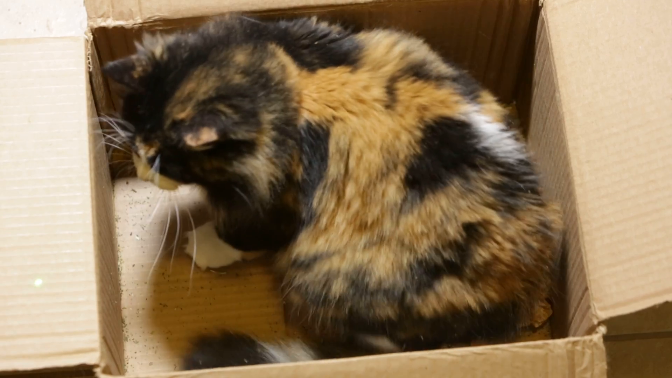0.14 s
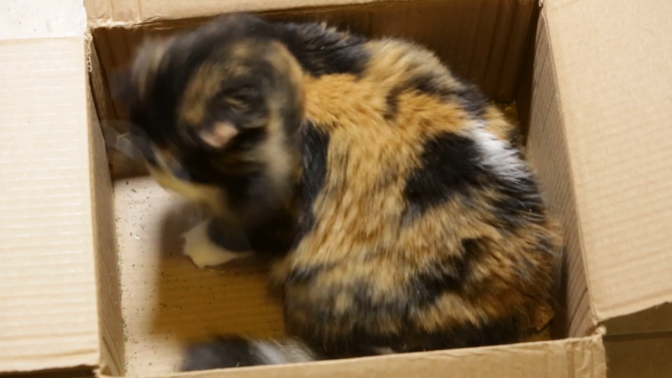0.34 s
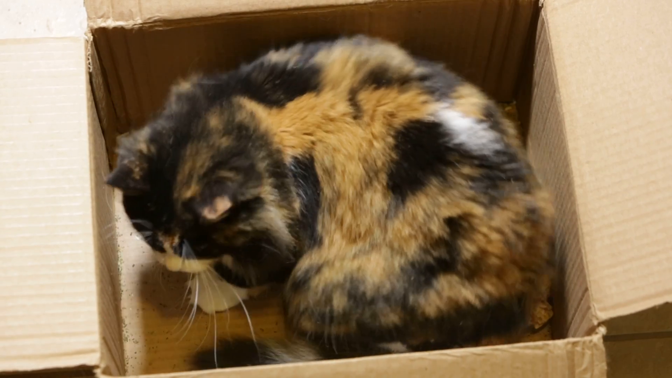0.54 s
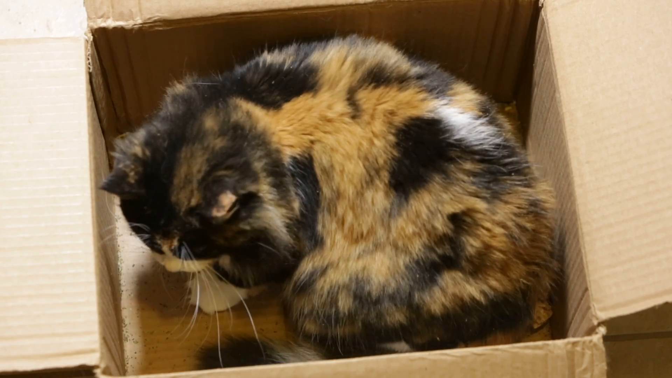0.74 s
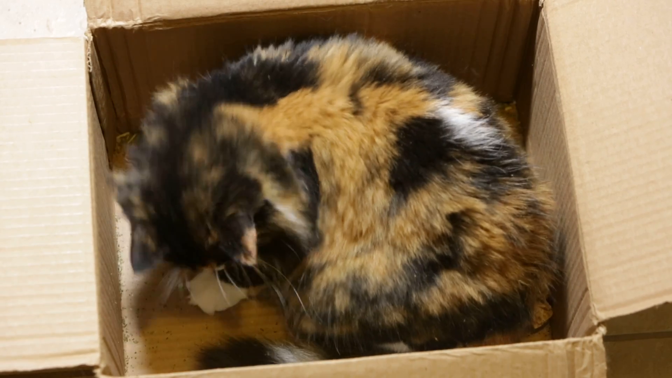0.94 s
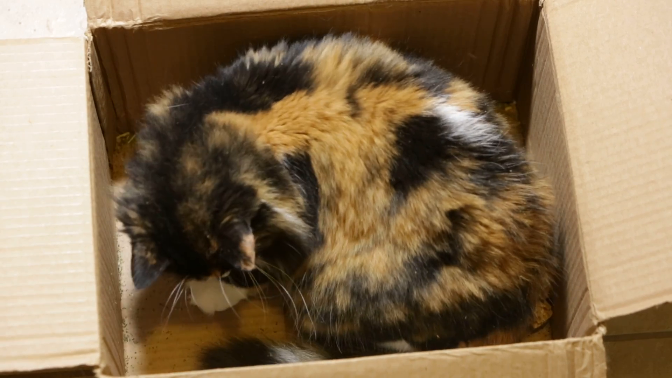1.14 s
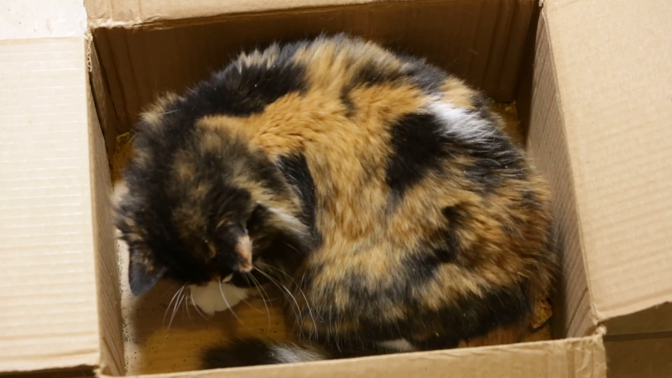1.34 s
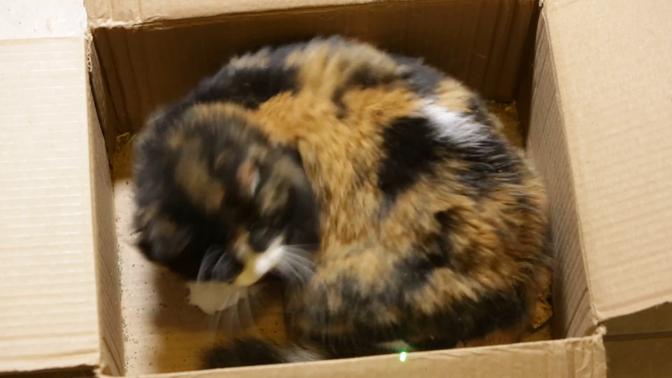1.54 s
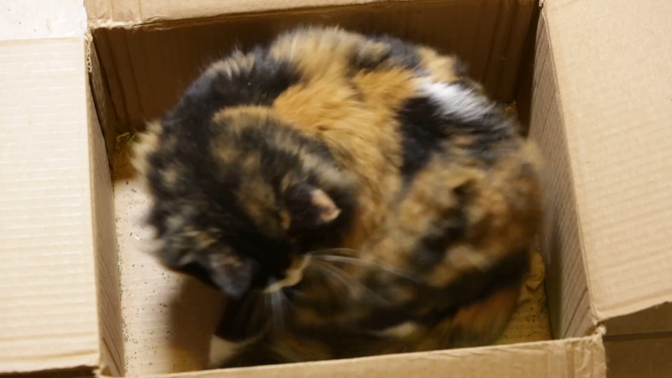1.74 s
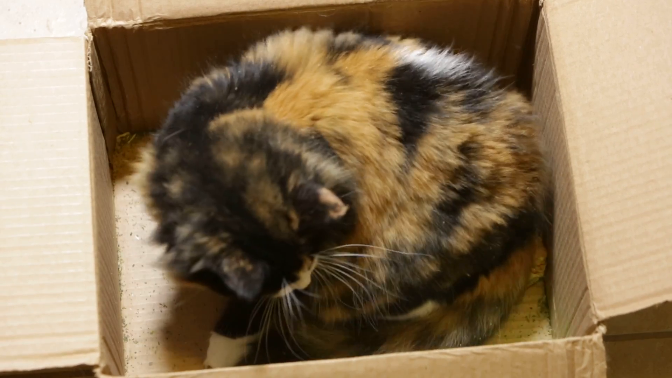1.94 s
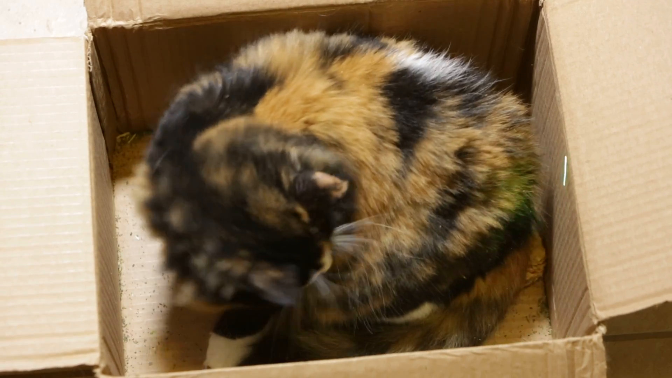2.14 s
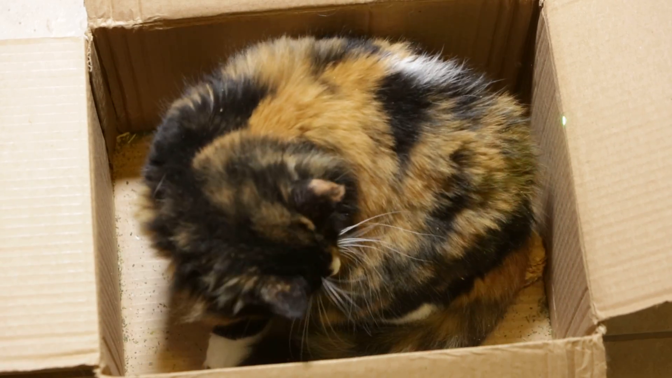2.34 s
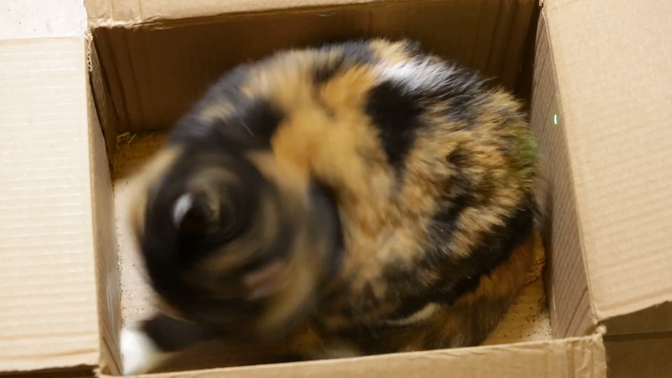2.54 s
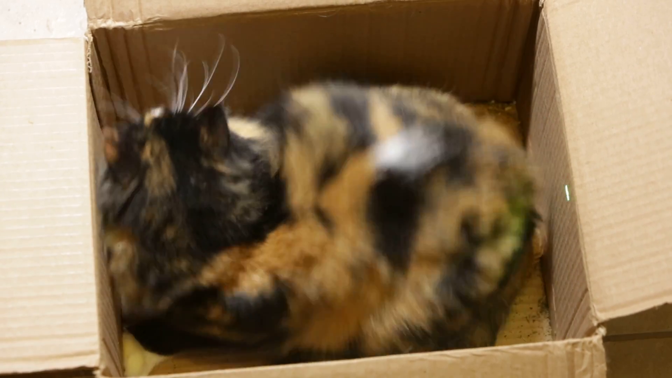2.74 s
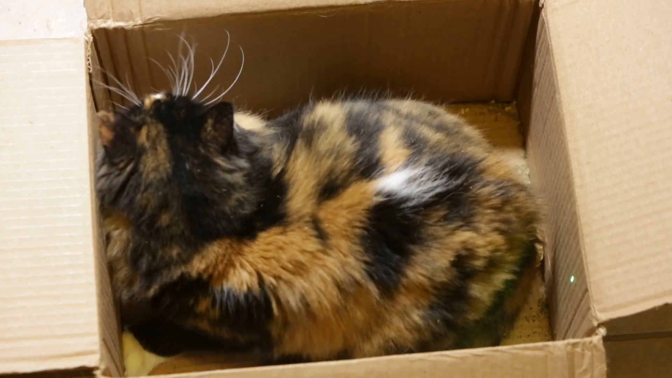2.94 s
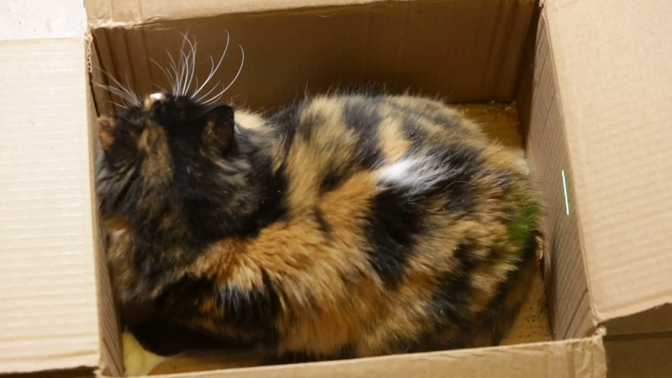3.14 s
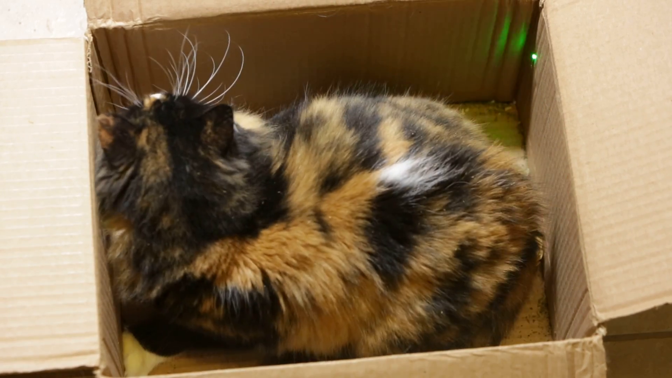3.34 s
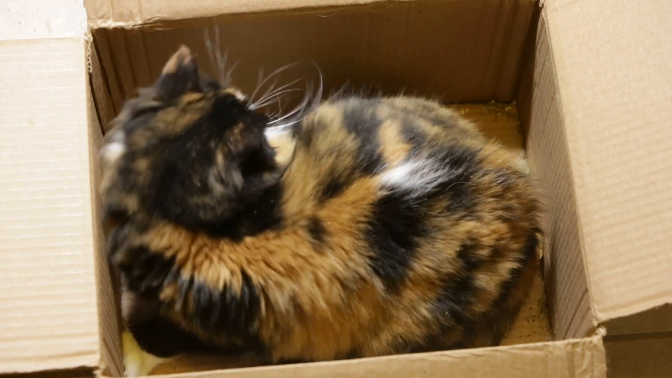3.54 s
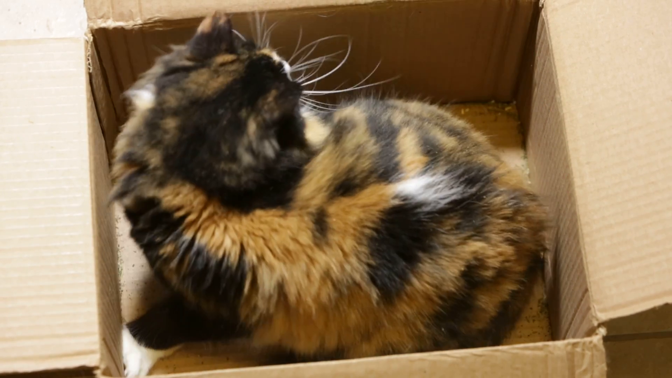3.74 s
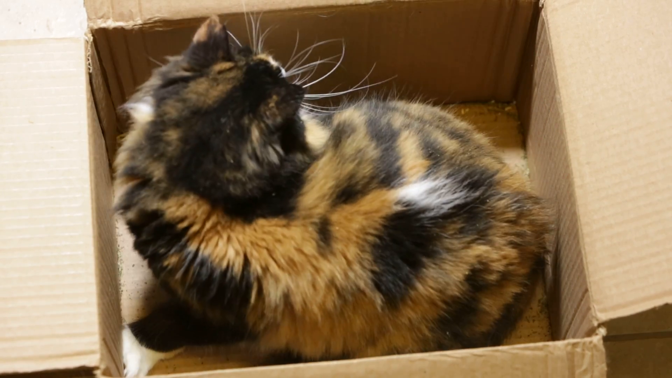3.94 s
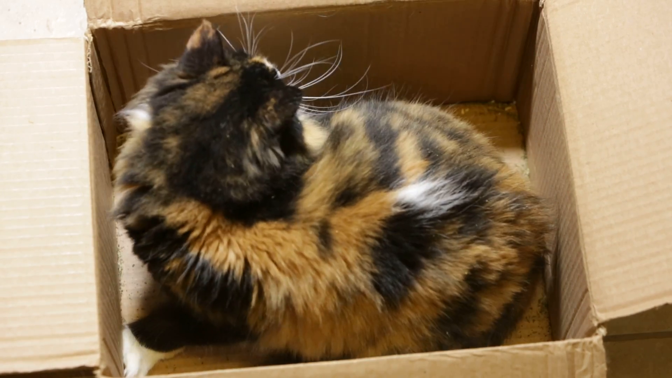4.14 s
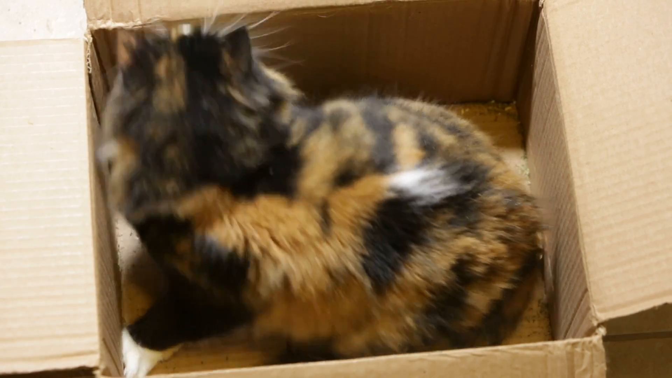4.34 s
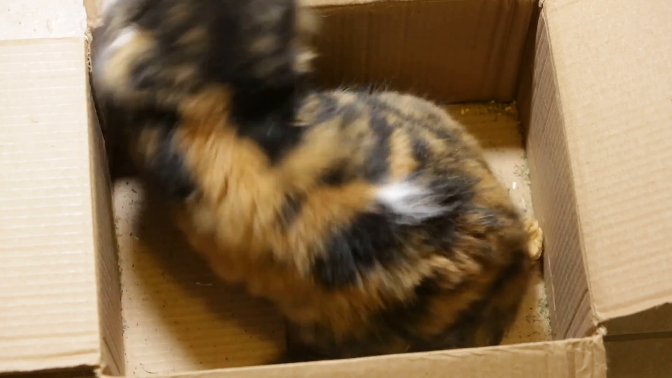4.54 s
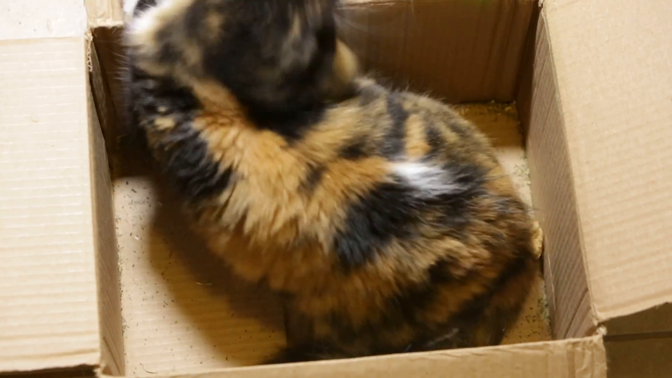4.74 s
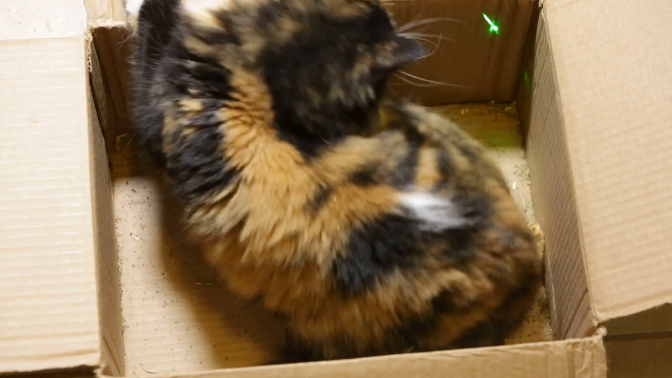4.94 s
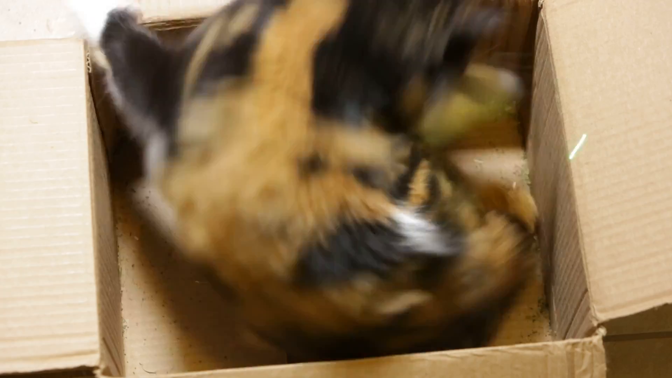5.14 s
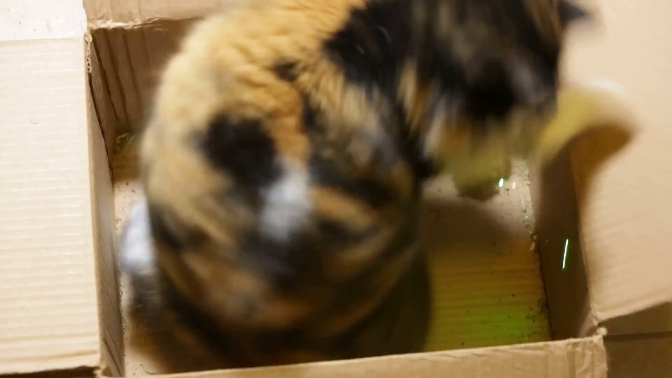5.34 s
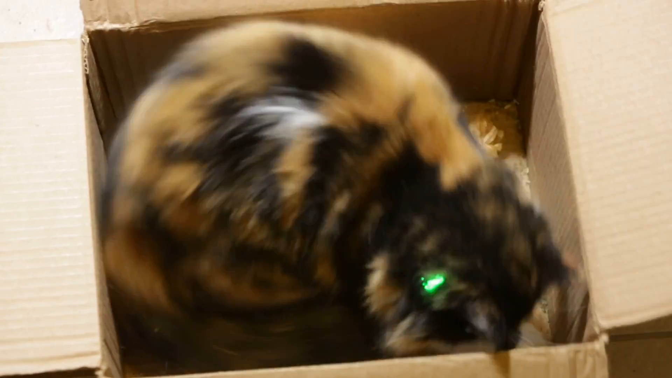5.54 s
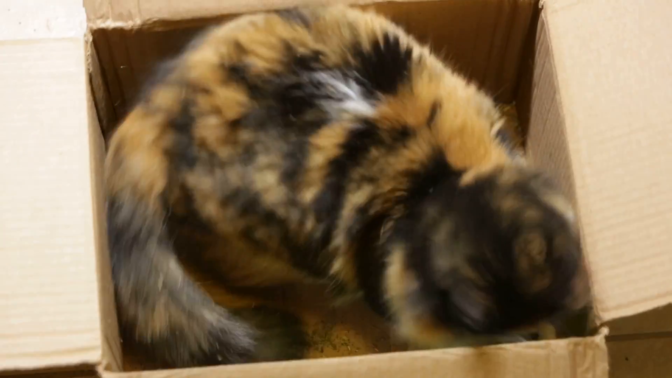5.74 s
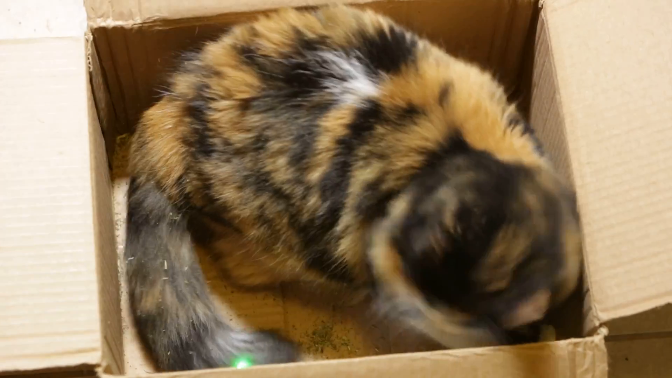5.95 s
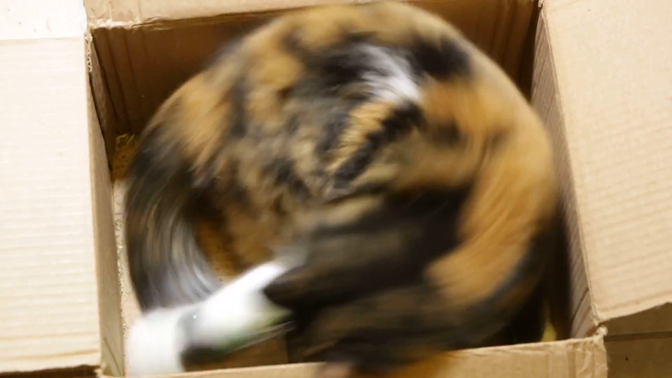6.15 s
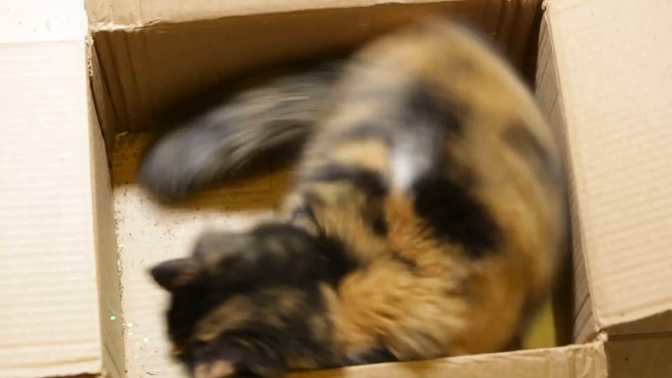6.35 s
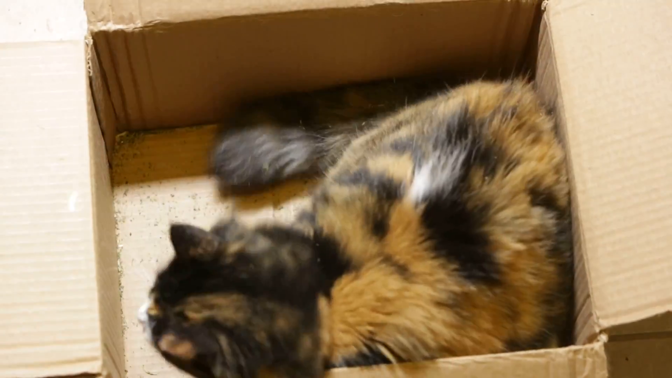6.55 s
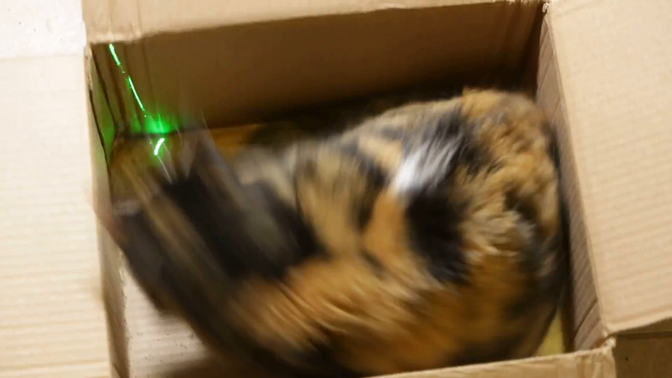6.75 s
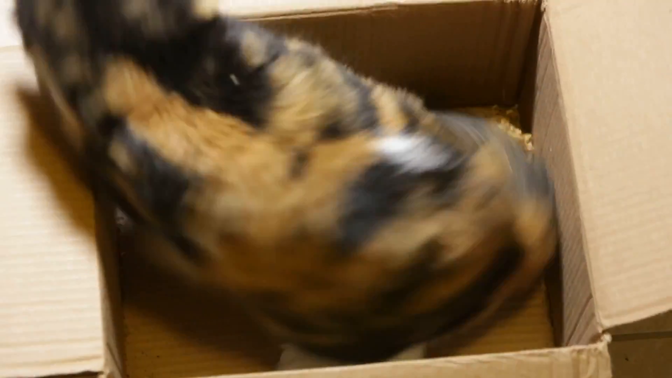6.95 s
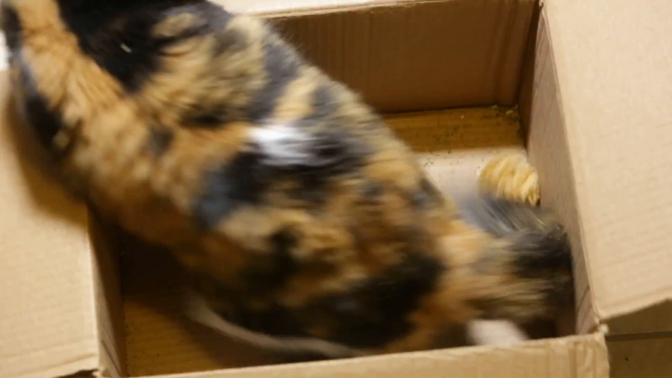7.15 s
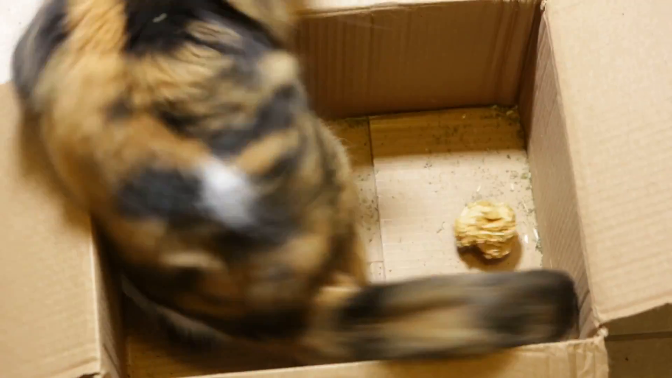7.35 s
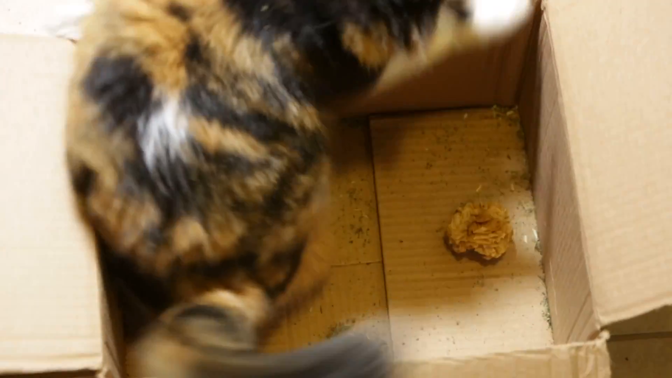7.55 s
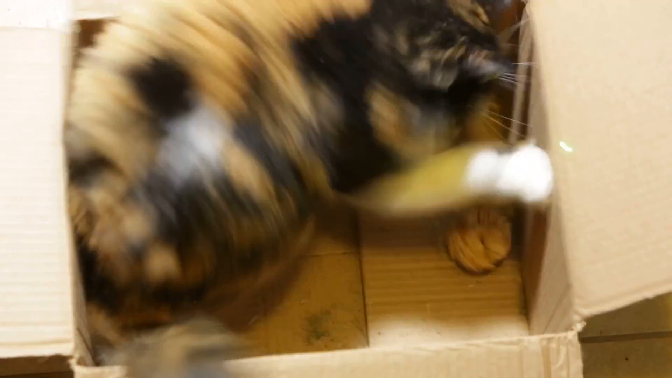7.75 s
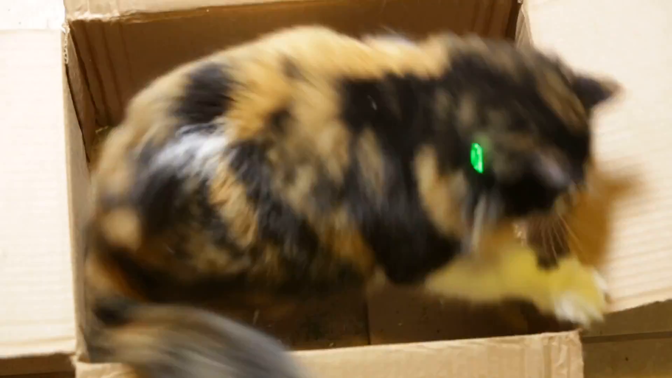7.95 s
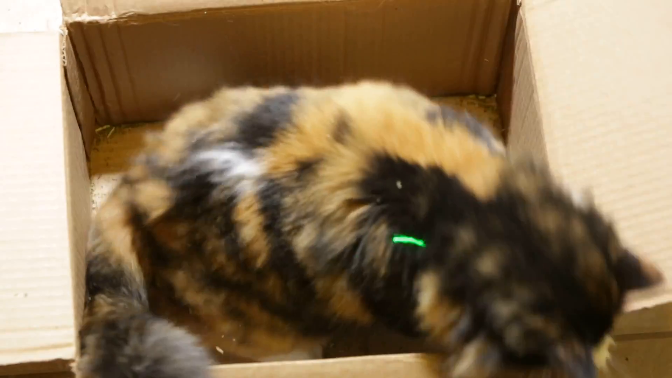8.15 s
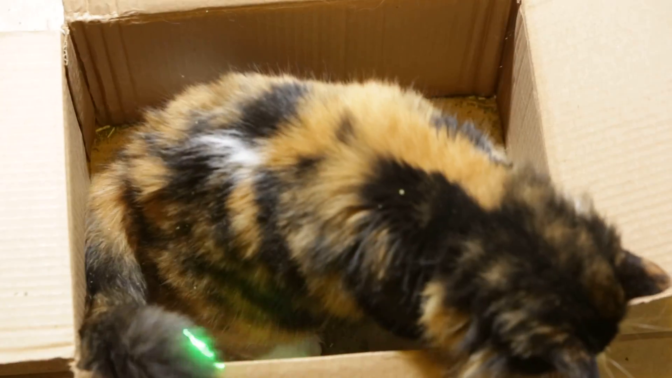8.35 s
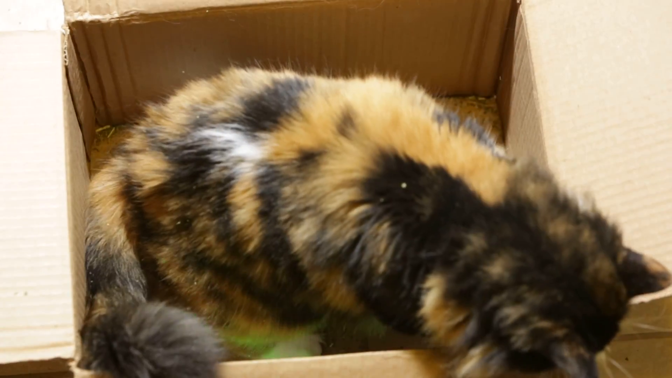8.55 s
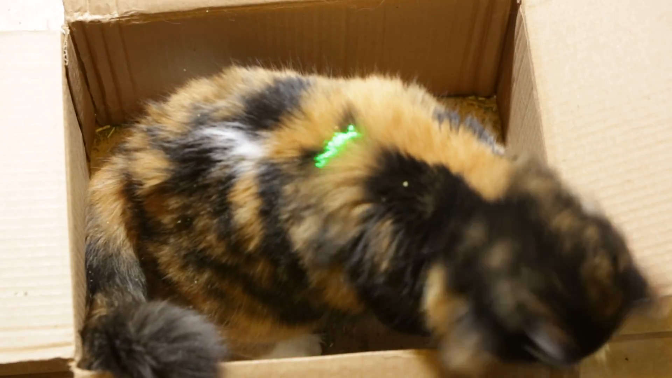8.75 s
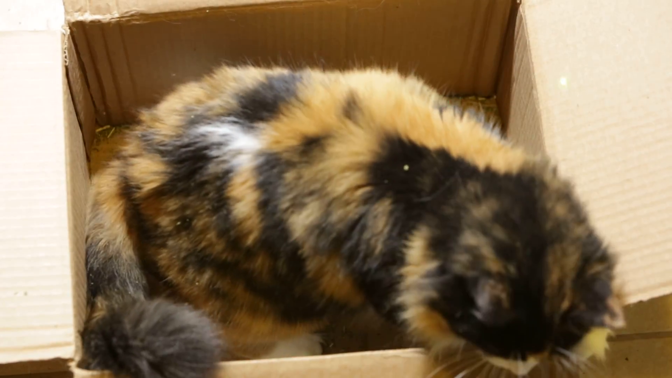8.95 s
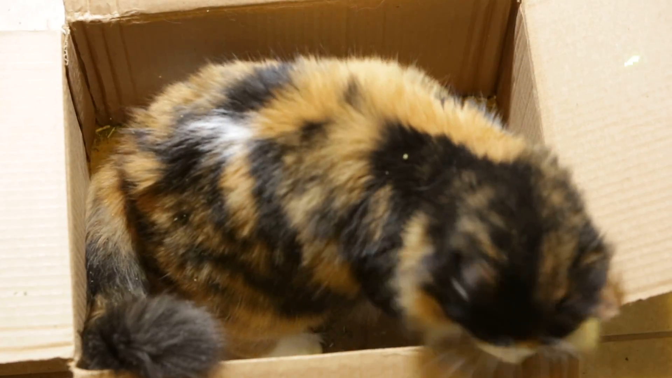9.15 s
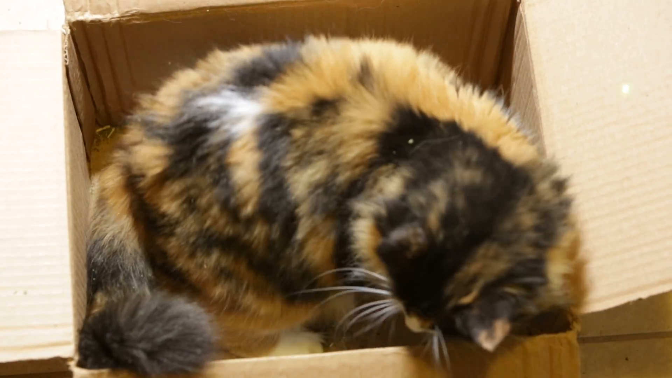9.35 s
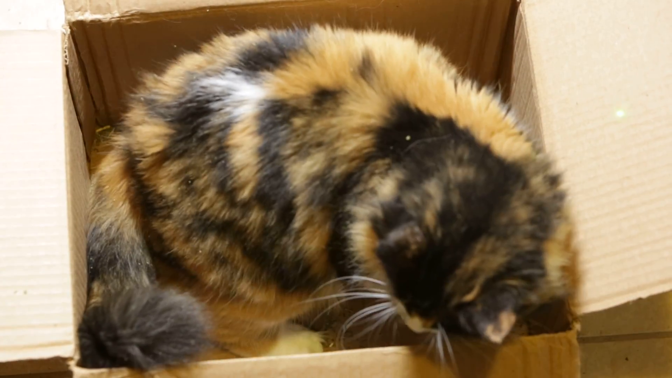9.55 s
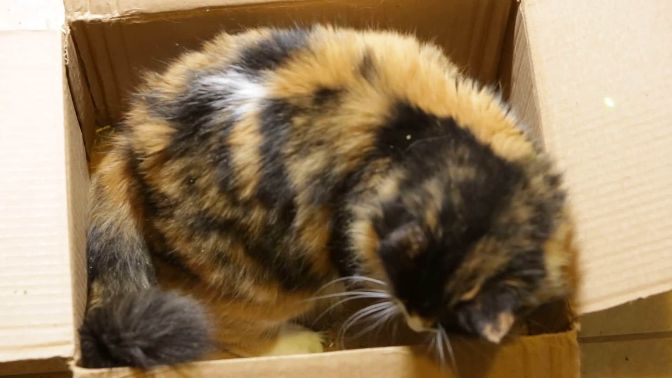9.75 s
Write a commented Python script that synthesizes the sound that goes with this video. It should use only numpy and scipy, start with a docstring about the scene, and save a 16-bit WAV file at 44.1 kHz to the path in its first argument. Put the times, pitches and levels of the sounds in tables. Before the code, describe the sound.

Close bursts of claw scrapes, sharp ticks and hollow paw slaps on cardboard, sparse at first, then busy, as a cat pounces inside a box.

```python
"""A soft rustle, then a sharp claw tick and a pat on cardboard: a cat chases a spot of light in a box.
The box stands open in a small, bare room, with one microphone just above it.
Paws slap and buckle the walls, claws tick and drag over the paper liner, pads knock and creak,
and the body thumps on the bottom. Blows and drags ring the hollow box and set the room booming.
The room echoes over a quiet, steady hush; once there is a faint whistle, like a breath through the nose."""
import sys
import numpy as np
from scipy import signal
from scipy.fft import rfft, irfft, next_fast_len
from scipy.io import wavfile

SR = 44100
rng = np.random.default_rng(int(sys.argv[2]) if len(sys.argv) > 2 else 0)


def int16_out(signal):
    """Quantize to a 16-bit WAV file."""
    q = np.round(np.clip(np.atleast_2d(signal).T, -1, 1) * 32767)
    wavfile.write(sys.argv[1], SR, q.astype(np.int16))


N = 431738
TOP_HZ = 16000
BLOW_WINDOW_S = .025  # a blow's level is its energy spread over this time
BODY_HZ, BODY_MS, BODY_LAG_S = 99, 9.5, 0.00812  # the thump of the cat's weight behind a pad


# Paws on the box, close below the microphone; high if claws land first, low if the pad does:
# (time [s], level [dB], centre [Hz], patter time [ms], body thump [dB])
PAW_SLAPS = [(.1, -34.5, 1467, 1.82, -72), (0.5117, -43.5, 1480, 2.84, -43.5), (1.923, -40, 997, 4.75, -47),
             (2.613, -30.5, 720, 11.7, -39.5), (4.411, -36, 560, 9, -36.5), (4.602, -37, 904, 12, -47),
             (5.2685, -19.5, 1015, 4.79, -52.5), (5.504, -19.5, 1008, 19.3, -37.5),
             (5.568, -26, 972, 4.6, -27), (5.854, -39, 1386, 2.75, -45.5), (6.257, -29.5, 648, 12, -35.5),
             (7.311, -25, 1172, 6, -45), (7.335, -26.5, 1300, 3.02, -35), (7.527, -28.5, 662, 3.42, -26.5),
             (7.8006, -22, 2100, 4.06, -35.5), (7.957, -31, 1176, 8.1, -38)]
def slaps(roll=1.2, pad_hz=398.3, pad_ms=11.36, even_hz=667, pad_db_per_octave=-9):
    """The toes hit, the paw rolls onto its pad, and the body's weight thumps in behind."""
    out = np.zeros(N)
    for s, db, hz, patter_ms, body_db in PAW_SLAPS:
        pad_s = s + roll * patter_ms / 1000
        pad_db = db + pad_db_per_octave * np.log2(hz / even_hz)  # the higher the slap, the less pad
        add(out, s, blow(db, hz, patter_ms))
        add(out, pad_s, blow(pad_db, pad_hz, pad_ms))
        add(out, pad_s + BODY_LAG_S, blow(body_db, BODY_HZ, BODY_MS))
    return out


# Pads pushing off the bottom of the box: (time [s], level [dB], centre [Hz], patter time [ms])
PAD_STEPS = [(.532, -42.5, 282, 9.8), (1.926, -43, 318, 7.2), (2.655, -38, 330, 14),
             (4.424, -32, 261, 12.4), (5.163, -37.5, 340, 7.4), (5.352, -26, 370, 21.3),
             (5.538, -22, 323, 26), (6.285, -21, 477, 19.1), (6.36, -28, 471, 19.2),
             (6.906, -32.5, 351, 60), (7.34, -26, 455, 11.1), (7.53, -24, 258, 10.6),
             (7.664, -32, 312, 11.3), (7.757, -30, 279.8, 14.8), (7.7953, -23, 299.4, 2.13),
             (7.895, -30, 330, 14), (8.082, -30, 368, 10.9)]
def steps(thump_db=-16.5):
    """A pad alone makes a dull, hollow knock, with a little of the body's weight behind it."""
    out = np.zeros(N)
    for s, db, hz, patter_ms in PAD_STEPS:
        add(out, s, blow(db, hz, patter_ms))
        add(out, s + BODY_LAG_S, blow(db + thump_db, BODY_HZ, BODY_MS))
    return out


def blow(db, hz, patter_ms, first_push=2.22, soft_ms=12, swell=0.136, spot_db=9, spot_hz=600):
    """A first push, then the patter of toes and buckling board; a long, soft shove has hardly any push."""
    t = clock(0.3)
    age = 1000 * t / patter_ms
    force = slips(t, rate=4000, spread_db=2.5) * np.exp(-age) * (1 - np.exp(-age / swell))
    force[0] += first_push * np.exp(-patter_ms / soft_ms)
    force = band(force, hz / 2, hz * 1.82)
    # the struck spot has a hollow note of its own, which the soft board damps when it is high
    note = undb(spot_db) / (1 + (hz / spot_hz) ** 2) * ring(force, hz, q=6)
    return level(resonate(force) + note, db, BLOW_WINDOW_S)


# A side wall buckling under a hard paw, close up: (time [s], level [dB], pitch [Hz], flap knock [dB])
WALL_CRACKS = [(5.268, -22.5, 1653, -20), (5.504, -28.5, 1760, -25.5), (7.8, -19, 2512, -21),
               (7.957, -33.5, 1500, -26)]
def cracks(snap_s=.0005, tear_s=0.00464, tear_db=-4, flap_hz=1066, flap_s=0.00201, flap_lag_s=0.003607):
    """The wall snaps through and its flutes crush; just after, the loose flap knocks with a short note."""
    out, t = np.zeros(N), clock(.04)
    flap = np.sin(2 * np.pi * flap_hz * t) * t * np.exp(-t / flap_s)
    for s, db, hz, flap_db in WALL_CRACKS:
        snap = np.sin(2 * np.pi * hz * t) * np.exp(-t / snap_s)
        tear = band(rng.standard_normal(len(t)) * np.exp(-t / tear_s), hz, 2 * hz)
        add(out, s, level(snap, db, BLOW_WINDOW_S) + level(tear, db + tear_db, BLOW_WINDOW_S))
        add(out, s + flap_lag_s, level(flap, flap_db, BLOW_WINDOW_S))
    return out


# Hiss of the paper liner, close up: (frequency [Hz], relative level [dB])
LINER_SPECTRUM = [(200, -22.5), (1000, -1), (2500, -0.5), (4200, -1), (6300, -0.5), (9000, -3), (12000, -9),
                  (16000, -20.5)]
# Claws dragged along the inside of the box; scene() trims both levels:
# (time [s], length [s], liner hiss [dB], panel rasp [dB], rasp centre [Hz])
CLAW_RAKES = [(0.305, 0.01044, -45.5, -42.5, 1300), (0.525, 0.0248, -38.5, -39, 890),
              (1.646, 0.0456, -39, -40, 1464), (1.765, 0.044, -37, -49.5, 690),
              (1.806, 0.01744, -28.5, -33.5, 1250), (2.485, 0.0633, -48, -54.5, 1300),
              (2.611, 0.0564, -36.5, -32.5, 811), (2.722, 0.0742, -33, -42.5, 1840),
              (4.311, 0.0428, -42.5, -44, 926), (4.407, 0.0374, -31.5, -35.5, 1323),
              (4.601, 0.02, -39, -40, 1255), (5.167, 0.05, -42.5, -29.5, 1095),
              (5.5, 0.0506, -32, -20.5, 1040), (5.786, 0.0329, -31, -33.5, 693),
              (6.131, 0.0447, -57.5, -39, 1490), (6.252, 0.02308, -24, -19.5, 1036),
              (6.34, 0.113, -33.5, -49.5, 900), (6.876, 0.0509, -30, -31.5, 1097),
              (6.973, .07, -35.5, -31.5, 982), (7.09, .08, -42, -34, 950), (7.235, 0.037, -26, -31, 1270),
              (7.525, 0.01872, -22.5, -20.5, 806), (7.659, 0.0526, -32.5, -43, 2000),
              (7.741, 0.0634, -27, -36.5, 2200), (7.966, 0.0425, -23.5, -23, 2280),
              (8.078, 0.028, -25.5, -34, 1200), (8.133, 0.0143, -31, -23, 1965)]
def rakes(rise_s=.006, fall_s=0.0201, grain_db=2.28, spread=2.262, glide_per_s=2.2):
    """Claws slip over the flutes: the liner hisses and the panel rasps, its note gliding as they travel."""
    out = np.zeros(N)
    for s, length, hiss_db, rasp_db, hz in CLAW_RAKES:
        rise = rise_s + .4 * length  # long drags begin more gently
        t = clock(length + rise + 0.068) - .3 * rise
        age = t - t[0]
        grip = np.sin(np.pi / 2 * np.clip(age / rise, 0, 1)) ** 2
        pressure = grip * np.exp(-np.maximum(t - 0.759 * length, 0) / fall_s)
        # every patch of board has its own grain
        patch = [(point_hz, db + grain_db * rng.standard_normal()) for point_hz, db in LINER_SPECTRUM]
        hiss = colour(pressure * slips(t, rate=8000, spread_db=3.5), patch)
        jolts = band(slips(t, rate=3000, spread_db=5), hz / spread, hz * spread)
        glide = glide_per_s * rng.uniform(-1.041, 1)
        note = np.interp(age * (1 + glide * age), age, ring(jolts, hz, q=3))
        rasp = resonate(pressure * (jolts + note))
        add(out, s + t[0], level(hiss, hiss_db, length) + level(rasp, rasp_db, length))
    return out


# Rasp of the board under the sliding cat: (frequency [Hz], relative level [dB])
RASP_SPECTRUM = [(35, -37), (70, -5.5), (330, -2.5), (700, 4), (1200, 4.5), (2200, 1.5), (3500, -12),
                 (16000, -36)]
# Fur and feet sliding as the cat turns below the microphone; scene() trims both levels:
# (time [s], length [s], liner hiss [dB], panel rasp [dB])
BODY_SHUFFLES = [(-0.04, 0.547, -49.5, -53), (1.626, 0.3606, -45, -49), (3.503, 0.344, -61.5, -60.5),
                 (4.592, 0.69, -56, -59.5), (5.094, 0.3497, -32.5, -36), (5.495, 0.254, -43, -38.5),
                 (6.092, 0.3436, -43, -44.5), (6.736, 0.1865, -34.5, -37), (6.956, 0.2543, -38.5, -35.5),
                 (7.253, 0.2474, -36, -40), (7.623, 0.364, -36.5, -37.5), (8.027, 0.125, -38, -35),
                 (8.202, 0.226, -56.5, -56.5), (9.167, 0.082, -57, -62.5)]
def shuffles(attack_s=0.071, release_s=0.0293, judder_db=3.0, judder_rate=110):
    """The sliding body judders on the board: the liner hisses and the panel rasps anew for each move."""
    out, t = np.zeros(N), np.arange(N) / SR
    hiss = level(colour(slips(t, rate=5000, spread_db=5), LINER_SPECTRUM), 0, N / SR)
    for s, length, hiss_db, rasp_db in BODY_SHUFFLES:
        now = slice(*np.searchsorted(t, [s - attack_s, s + length + .5]))
        age = t[now] - s
        pressure = np.clip(age / attack_s + .5, 0, 1) * np.exp(-np.maximum(age - length, 0) / release_s)
        jolts = colour(slips(age, rate=2500, spread_db=7.0), RASP_SPECTRUM)
        rasp = level(resonate(jolts), rasp_db, len(age) / SR)
        out[now] += pressure * (undb(hiss_db) * hiss[now] + rasp)
    return undb(judder_db * wander(t, judder_rate)) * out


# Claw tips catching in the liner, close up; scene() trims the level: (time [s], level [dB])
CLAW_TICKS = [(0.0935, -40), (0.0989, -27.5), (0.2387, -40.5), (.308, -44), (.529, -35), (0.5644, -37),
              (1.811, -31), (1.9221, -28.5), (2.11, -55), (2.309, -52), (2.441, -57), (4.41, -30),
              (4.442, -36.5), (5.163, -31.5), (5.2045, -42.5), (5.326, -36.5), (5.569, -29), (5.7136, -42),
              (5.782, -35.5), (5.8541, -36.5), (6.349, -34.5), (6.7656, -33.5), (6.88, -30.5), (7.004, -29),
              (7.2441, -24.5), (7.527, -33), (7.854, -37.5), (8.0874, -28.5), (8.135, -23), (8.449, -50.5)]
def ticks(centre_hz=5304, scatter_octaves=0.135, spread=1.448, crack_s=.0022, tear_s=0.0053, tear_db=1):
    """A claw snaps off the paper: a very short crack, trailed by tearing fibres."""
    out, t = np.zeros(N), clock(0.051)
    # bending waves carry the treble faster than the bass, so the crack is a quick downward sweep
    sweep = np.minimum(t / crack_s, 1)
    crack = np.sin(np.pi * TOP_HZ * crack_s * (1 - sweep) ** 2)
    for s, db in CLAW_TICKS:
        fibres = slips(t, rate=5000, spread_db=3) * np.exp(-t / tear_s)
        snap = level(crack, 0, 1) + level(fibres, tear_db, 1)
        hz = centre_hz * 2 ** (scatter_octaves * rng.standard_normal())
        add(out, s, level(band(snap, hz / spread, hz * spread, order=1), db, BLOW_WINDOW_S))
    return out


# First a faint, high whistle like a breath through the nose; the other rows are creaks in the box:
# (time [s], length [s], pitch [Hz], level [dB])
WHISTLE_AND_CREAKS = [(1.29, .11, 2900, -68), (2.613, .045, 408, -34), (5.178, .025, 1240, -33),
                      (7.311, .012, 1200, -27), (9.184, .05, 1100, -60)]
def whistle_and_creaks(rise_s=0.0085, fall_s=0.0174, sag_per_s=0.55, jitter=0.0322, rough_rate=350):
    """Short, rough notes that sag in pitch; in a creak, a gripping pad slips in step with the board."""
    out = np.zeros(N)
    for s, length, hz, db in WHISTLE_AND_CREAKS:
        t = clock(length + .08)
        pitch = hz * (1 - sag_per_s * t + jitter * wander(t, rough_rate))
        phase = 2 * np.pi * np.cumsum(pitch) / SR
        envelope = np.minimum(t / rise_s, 1) * np.exp(-np.maximum(t - length, 0) / fall_s)
        roughness = undb(2 * wander(t, rough_rate))
        note = np.sin(phase) + undb(-10.5) * np.sin(1.73 * phase)  # one inharmonic overtone
        add(out, s, level(envelope * roughness * note, db, length))
    return out


def slips(t, rate, spread_db):
    """Stick-slip on paper fibres: tiny jolts at random moments, a few much larger than the rest."""
    draws = (rng.random, rng.standard_normal, rng.standard_normal)
    chance, size, push = (draw(max(SR, len(t)))[:len(t)] for draw in draws)
    return (chance < rate / SR) * np.sign(push) * undb(spread_db * np.clip(size, -2, 2))


# Low booming resonances of the room (first three rows), and the hollow ring of the box:
# (frequency [Hz], width [Hz], level over the broad response [dB])
ROOM_AND_BOX_MODES = [(73.6, 5.7, 13.5), (95.45, 15.7, 11.5), (117, 8.2, -0.5), (189.5, 22.7, 3),
                      (261.5, 52, 2), (354.8, 28.4, 12.5), (524.4, 24.8, -3), (1046, 40, -13.5)]
def resonate(x, detune=.014, place_db=2):
    """The room booms and the box rings; each contact favours other modes and shifts them slightly."""
    out = x
    for hz, width, db in ROOM_AND_BOX_MODES:
        shift, place = rng.standard_normal(2)
        out = out + undb(db + place_db * place) * ring(x, hz * (1 + detune * shift), hz / width)
    return out


def room(x, paths=11, shift_rate=25):
    """The cat keeps moving, so its sound enters the room by ever-changing paths."""
    shares = np.array([wander(np.arange(N) / SR, shift_rate) for _ in range(paths)])
    shares = shares / np.sqrt(np.sum(shares ** 2, axis=0))
    return x + sum(signal.oaconvolve(x * share, reflections())[:N] for share in shares)


# The bare room beyond the box, as it reaches the microphone:
# (lower band edge [Hz], time to fall 60 dB [s], level against the direct sound [dB])
ROOM_DECAY = [(38.5, 0.501, -2), (270, 0.4828, -1.5), (8290, 0.374, -0.5)]
def reflections(build_s=0.00149, box_s=0.0041, box_db=-7):
    """One set of paths: quick reflections between the box walls, then the diffuse decay of the room."""
    t = clock(0.89)
    upper_edges = [row[0] for row in ROOM_DECAY[1:]] + [TOP_HZ]
    box = rng.standard_normal(len(t)) * (t > .001) * np.exp(-t / box_s)
    response = level(box, box_db, 1 / SR)
    noise = rfft(rng.standard_normal(len(t)))
    f = np.arange(len(noise)) * SR / len(t)
    for (lo, t60, db), hi in zip(ROOM_DECAY, upper_edges):
        decay = level(undb(-60 * t / t60) * (1 - np.exp(-t / build_s)), db, 1 / SR)
        response = response + decay * irfft(noise * (f >= lo) * (f < hi), len(t))
    return response


# Room tone at the microphone, behind everything: (frequency [Hz], relative level [dB])
HUSH_SPECTRUM = [(12, -56.5), (20, -12.5), (107, -0.5), (198, -5.5), (350, -2.5), (780, -7), (1860, -12),
                 (10000, -19), (16000, -24.5)]
def hush(db=-55):
    """Steady room air and microphone hiss."""
    return level(colour(rng.standard_normal(N), HUSH_SPECTRUM), db, N / SR)


def undb(db):
    """Decibels to gain."""
    return 10 ** (np.asarray(db) / 20)


def level(x, db, seconds):
    """Scale x to the energy of a sound that holds this level for so many seconds."""
    return x * undb(db) * np.sqrt(seconds * SR / np.sum(x ** 2))


def clock(seconds):
    """Sample times of a short sound."""
    return np.arange(int(seconds * SR)) / SR


def add(out, s, x):
    """Mix x into out at time s; it may already be sounding at time zero."""
    i = int(s * SR)
    x, i = x[max(-i, 0):], max(i, 0)
    out[i:i + len(x)] += x[:max(N - i, 0)]


def band(x, lo_hz, hi_hz, order=2):
    """Causal band-pass."""
    return signal.lfilter(*signal.butter(order, [lo_hz, min(hi_hz, .45 * SR)], "band", fs=SR), x)


def ring(x, hz, q):
    """One resonance, gain 1 at its centre."""
    return signal.lfilter(*signal.iirpeak(hz, q, fs=SR), x)


def colour(x, points):
    """Shape the spectrum of x by (Hz, dB) points."""
    hz, db = np.transpose(points)
    size = next_fast_len(len(x) + 512)
    f = np.maximum(np.arange(size // 2 + 1) * SR / size, 1)
    gain = undb(np.interp(np.log(f), np.log(hz), db))
    return irfft(rfft(x, size) * gain, size)[:len(x)]


def wander(t, rate, count=4096):
    """Random values joined by straight lines, so many a second."""
    return np.interp(t * rate, np.arange(count), rng.standard_normal(count))


def scene(scrape_db=-2, tick_db=-2):
    """The cat in its box and the room around it, from one microphone just above."""
    claws_and_fur = undb(scrape_db) * (shuffles() + rakes()) + undb(tick_db) * ticks()
    close = claws_and_fur + slaps() + steps() + cracks() + whistle_and_creaks()
    # microphone low cut: removes the deep rumble below 58 Hz
    close = signal.sosfilt(signal.butter(6, 58, "high", fs=SR, output="sos"), close)
    return (room(close) + hush())[None]


def record(dry):
    """The hardest slaps touch full scale; the top is cut."""
    top_cut = signal.ellip(10, .1, 80, TOP_HZ, fs=SR, output="sos")
    return signal.sosfilt(top_cut, np.clip(dry, -1, 1))


dry = scene()
out = record(dry)
int16_out(out)
```